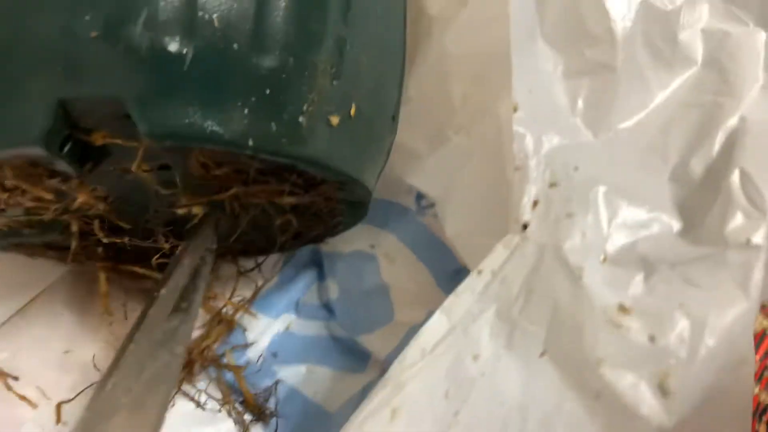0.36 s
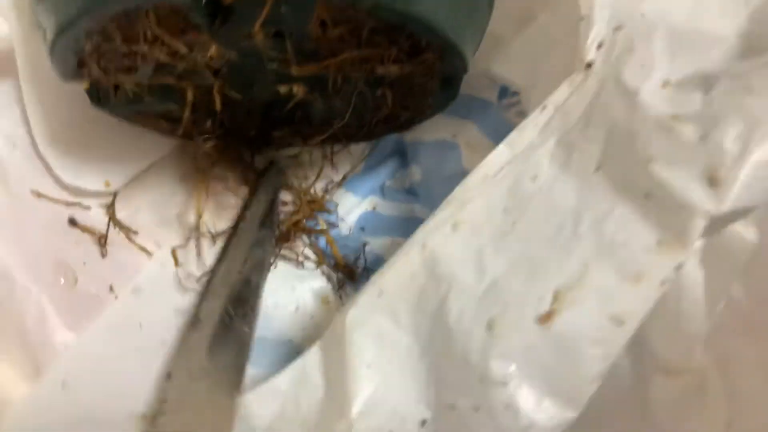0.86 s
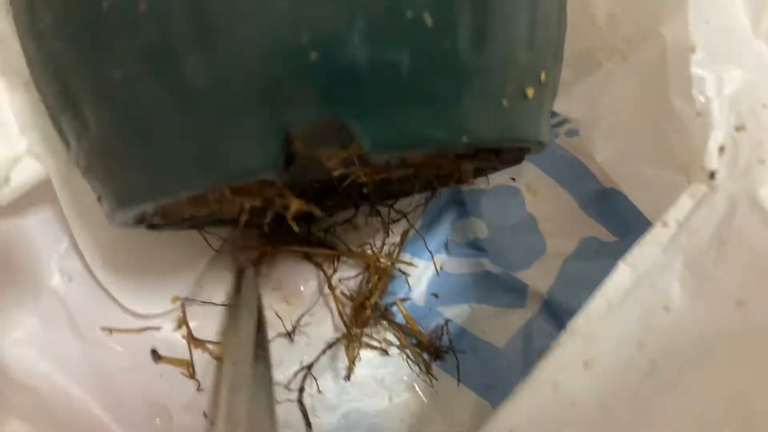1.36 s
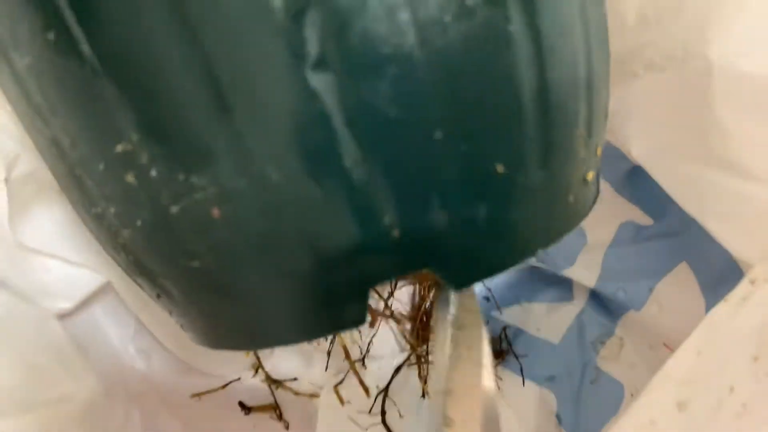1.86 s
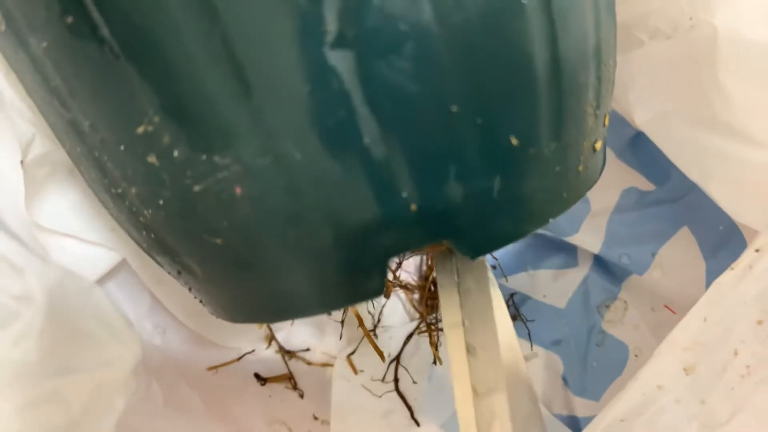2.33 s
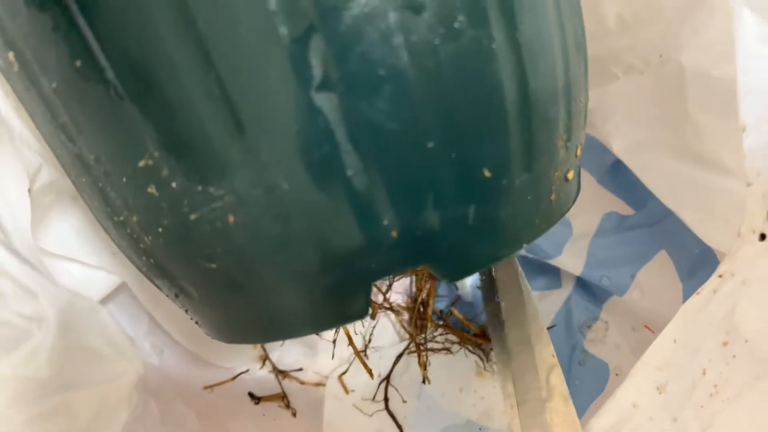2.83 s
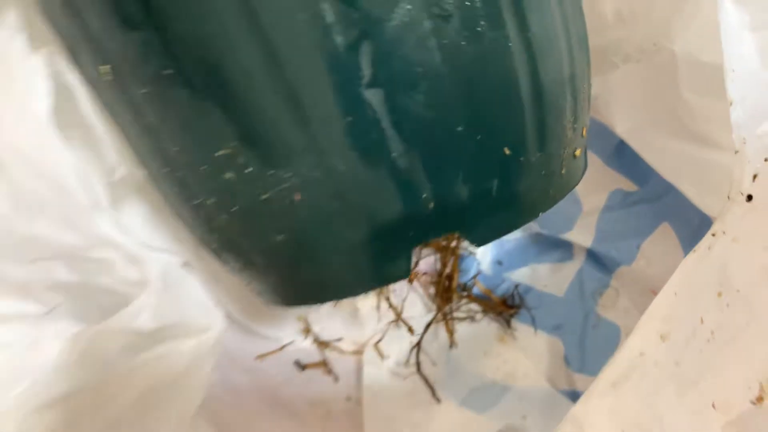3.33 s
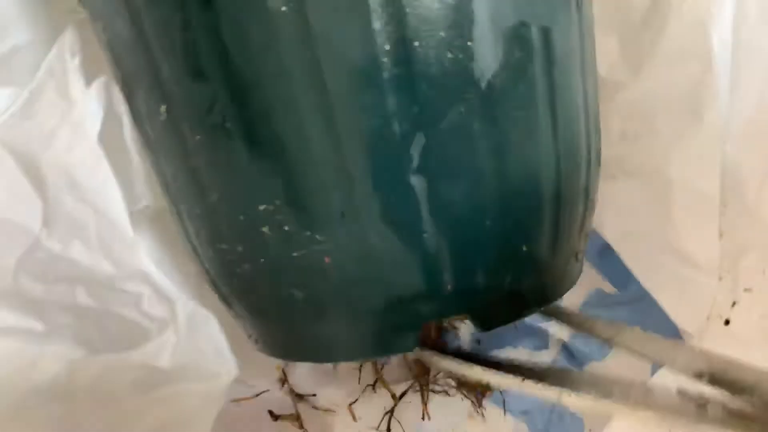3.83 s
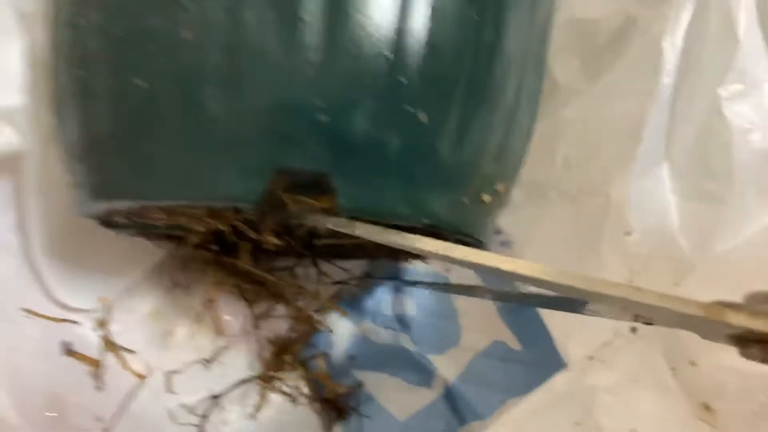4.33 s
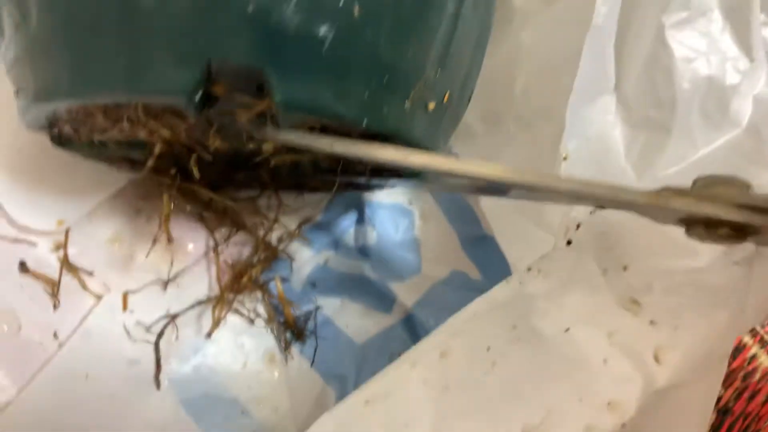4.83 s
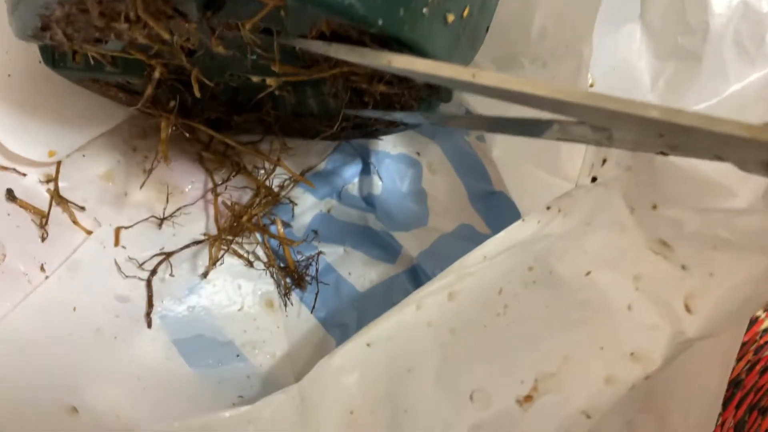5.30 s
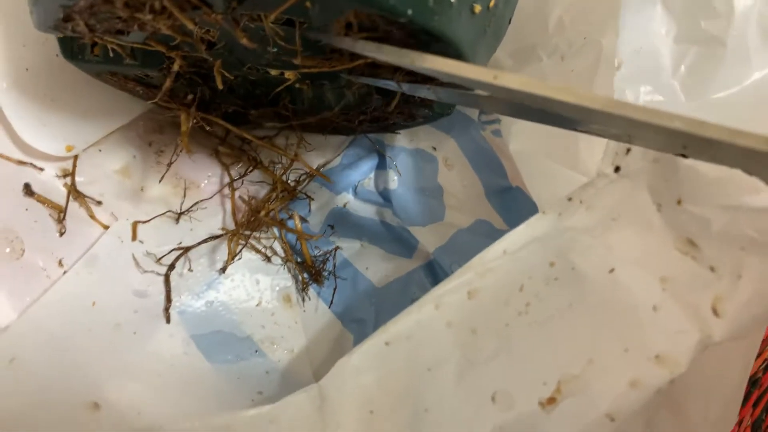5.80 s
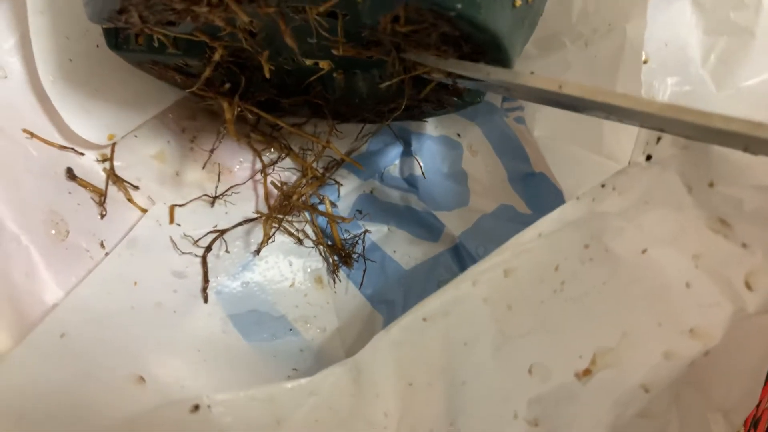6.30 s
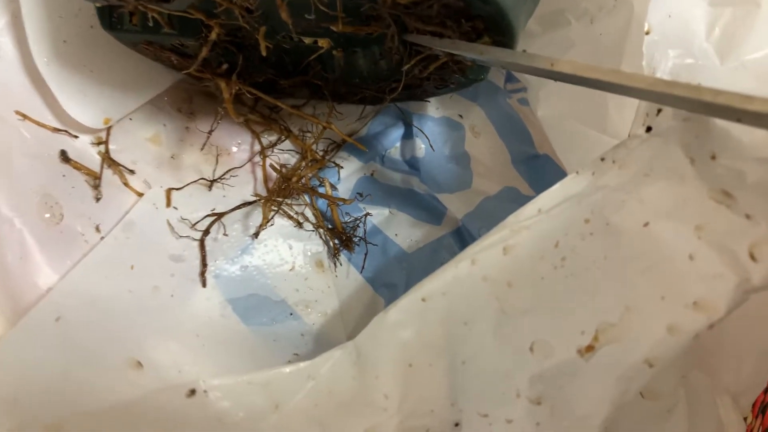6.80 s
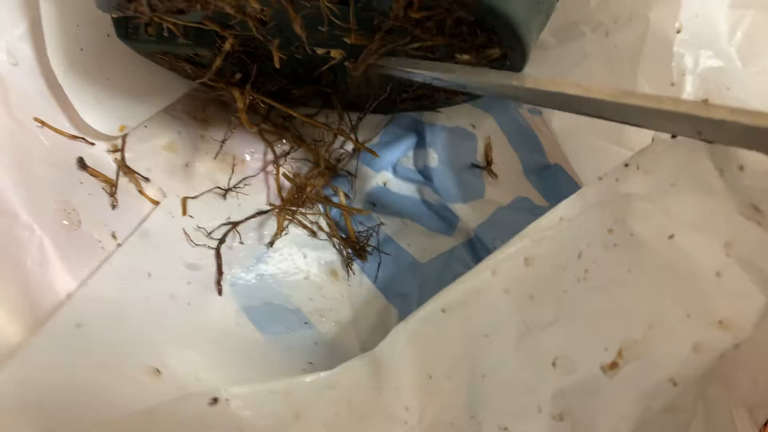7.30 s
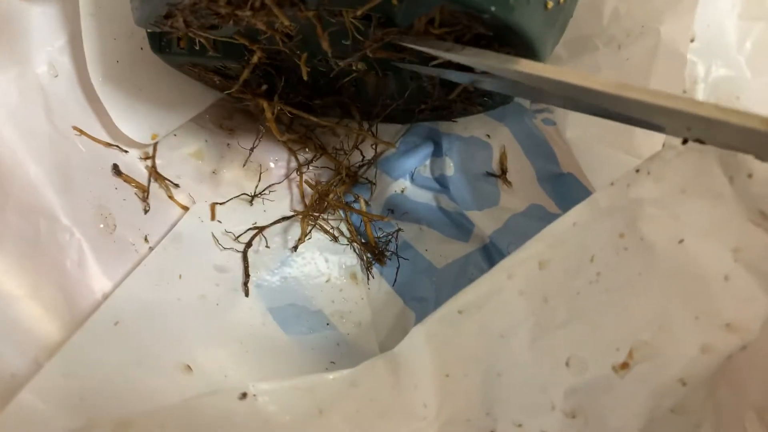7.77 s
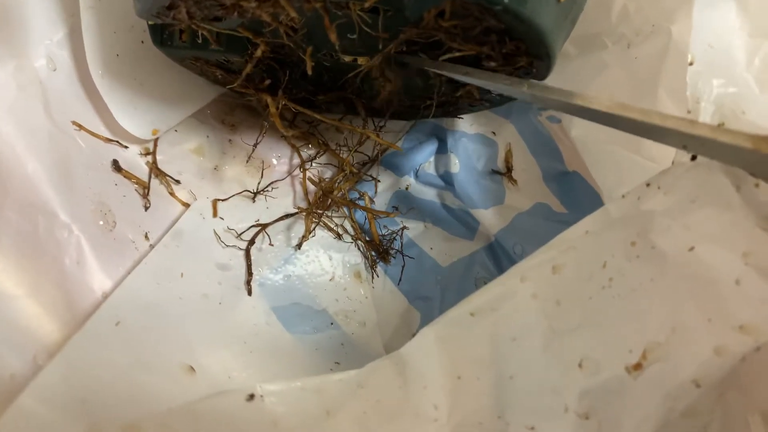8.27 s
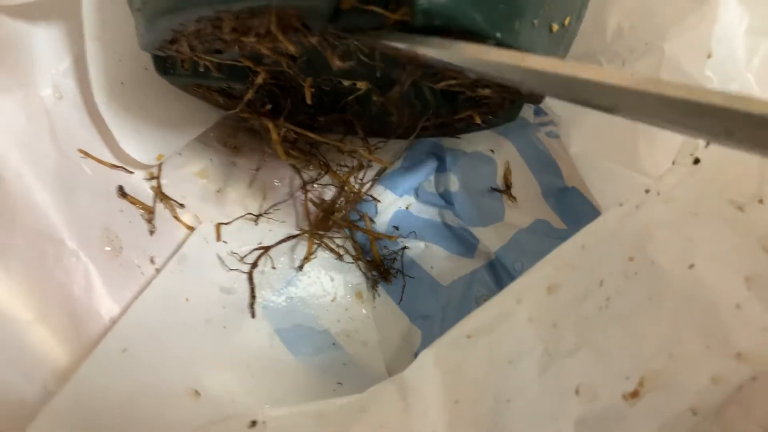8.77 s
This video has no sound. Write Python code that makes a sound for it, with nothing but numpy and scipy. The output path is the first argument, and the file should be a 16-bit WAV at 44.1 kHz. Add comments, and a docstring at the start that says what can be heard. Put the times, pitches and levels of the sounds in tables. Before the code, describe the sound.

Dry roots and thin plastic rustle and crackle busily, then quiet down; a pot knocks once, and later scissors snap shut amid renewed crackling.

```python
"""Scissors work through dry roots under a plastic plant pot on thin plastic bags, close to a phone in a quiet room.
Throughout, shaped noise is the room's air and wavering sines are a small motor. At first roots and film rustle
densely (friction noise in narrow bands) and crack (ringing noise bursts), with soft bumps (decaying modes).
Past 3 s the pot slides (swelling hiss) and knocks once (modal ringing); a faint sine whistle falls as rubbing goes on.
Past 8 s the blades grind (noise through modes) and snap shut once (modal ringing); dense rustle and cracks follow."""
import sys
import numpy as np
from scipy import signal
from scipy.fft import rfft, irfft, next_fast_len
from scipy.io import wavfile
from scipy.ndimage import uniform_filter1d

SR = 44100
rng = np.random.default_rng(int(sys.argv[2]) if len(sys.argv) > 2 else 0)


def nominal_scale(level):
    """Amplitude ratio for a level in decibels (scalar or array-like)."""
    x = np.asarray(level, float) / 20
    return 10 ** x


def transcribe(u):
    """Save the signal u as a 16-bit wav file named by the first command-line argument.

    u: samples, shape (n,) or (channels, n), limited to [-1, 1]; the rate is SR.
    q: integer samples, one column per channel.
    """
    v = np.clip(np.atleast_2d(u).T, -1, 1)
    q = np.round(v * 32767).astype(np.int16)
    wavfile.write(sys.argv[1], SR, q)


N = 403074
T = np.arange(N) / SR  # t/s

# Spectrum of the room's air noise: f/Hz, relative density level/dB
ROOM_SPECTRUM = [(25, -38.5), (40, -9.5), (60, -6), (96, -3), (151, -7), (194, -4), (290, -5), (400, -15.5),
                 (751, -19.5), (1100, -23.5), (1500, -35), (3000, -44.5), (7900, -49.5), (8700, -53.5),
                 (13800, -53.5), (16000, -74)]
# Lines of the motor hum: f/Hz, mean amplitude level/dB, wavering rate/s^-1
HUM_LINES = [(93.3, -78, 28), (147.3, -56.5, 16), (257, -74.5, 29), (293, -70.5, 11)]
# Path of the faint falling whistle: t/s, f/Hz, amplitude level/dB
WHISTLE_PATH = [(3.96, 1960, -95), (4.0, 1910, -74), (4.08, 1850, -75), (4.1, 1720, -88), (4.14, 1665, -75),
                (4.34, 1530, -76), (4.38, 1500, -95)]
# Swell and fade of the sliding pot: t/s, mean rms level/dB
SLIDE_LEVELS = [(3.03, -87), (3.12, -66), (3.25, -58), (3.34, -58), (3.45, -60), (3.5, -66), (3.56, -83)]
# Spectrum of the sliding hiss: f/Hz, relative density level/dB
SLIDE_SPECTRUM = [(300, 0), (900, -1.5), (2000, -4), (4500, -5.5), (7600, -9), (8600, -20), (14000, -28),
                  (16000, -40)]
# Blades grinding along each other as they close and part: t/s, rms level before decay/dB, t60/ms
BLADE_SCRAPES = [(8.311, -36, 70), (8.3195, -27.5, 9.8), (8.329, -34, 51), (8.335, -42.5, 240)]
# Modes of the blades: f/Hz, relative level/dB, t60/ms
BLADE_MODES = [(2150, -17, 6), (3300, -14, 3.5), (4300, 0, 3.2), (5440, -5, 5.5), (7150, -2.5, 4.5),
               (7700, -5, 3), (9750, -11, 4.5), (14500, -34, 4)]
# Soft bumps of pot and hand: t/s, mode level/dB, f/Hz, t60/ms, level of the jolt through the phone/dB
SOFT_BUMPS = [(0.696, -28, 275, 30, -37), (0.765, -34, 323, 28, -36), (1.14, -42, 276, 44, -35.5),
              (1.333, -40.5, 553, 67, -36.5), (2.499, -45, 427, 35, -75), (4.112, -35, 400, 32, -59),
              (6.964, -26.5, 519, 23, -47), (6.975, -33, 266, 40, -38.5), (6.973, -32, 610, 30, -53),
              (8.317, -38, 436, 53, -52), (8.431, -27, 567, 22, -55), (8.442, -42, 416, 130, -42),
              (8.499, -37.5, 257, 51, -38), (8.528, -36.5, 615, 23, -54), (8.69, -33, 280, 27, -45),
              (8.816, -39.5, 315.6, 65, -55), (8.996, -35.5, 433, 49, -40), (9.025, -33, 314, 37, -56),
              (9.11, -38, 583, 25, -49)]
# Modes of the pot: f/Hz, relative level/dB, t60/ms
POT_MODES = [(692, -1, 25), (729, -4.5, 25), (980, -2, 13), (1220, -1, 8.2), (1570, -2.5, 10.7),
             (2430, -21, 7.8), (3100, -21, 10), (4400, -16, 4.7), (6500, -13.5, 1.8)]
# Clearest cracks of root and film: t/s, peak level of the bright part/dB, ring f/Hz, airy part re bright part/dB
CLEAR_CRACKS = [(0.022, -36.5, 4800, -6), (0.0373, -39.5, 7240, -11), (0.0633, -37.5, 4370, -2.5),
                (0.0789, -33.5, 4160, -11), (0.1567, -39, 5400, -9), (0.3606, -42, 1690, -7),
                (0.4612, -35, 1550, -8), (0.4761, -27.5, 3320, -12), (0.5132, -38.5, 3330, -22),
                (0.593, -33.5, 4560, -2), (0.615, -30, 5040, -1.5), (0.625, -28, 2800, -16),
                (0.685, -27, 5100, -11), (0.7083, -16.5, 4440, -8), (0.735, -33.5, 7500, 6),
                (0.7477, -30, 2410, -4), (0.7522, -41, 6000, -13), (0.7624, -23.5, 3550, -23),
                (0.7806, -30.5, 4200, -8), (0.8024, -38, 6000, -10), (0.8106, -37, 3350, -11),
                (0.84, -22.5, 2490, -6.5), (0.8599, -31.5, 1700, -5), (0.9022, -22.5, 5900, -7),
                (0.907, -36, 6000, -3), (0.9134, -29, 6900, -2), (0.9212, -21, 6800, -8),
                (0.9304, -31, 6650, -7), (0.966, -44, 2500, -14), (0.9779, -32, 6500, -13),
                (1.0033, -36, 8060, 4), (1.042, -37, 7920, -1), (1.068, -32.5, 3100, -9),
                (1.1033, -36, 4110, -10), (1.1134, -40, 4380, -7), (1.1398, -25, 3200, -38),
                (1.2132, -49, 2360, -13), (1.2585, -50, 4000, -1), (1.2858, -45, 3000, -10),
                (1.314, -35, 2360, -9), (1.3285, -28, 3960, -6), (1.3337, -21, 6440, -4),
                (1.339, -29, 3020, -13), (1.348, -30, 5270, -13), (1.3867, -30, 5800, -2),
                (1.412, -42, 5000, 0), (1.4155, -37, 4500, -14), (1.4414, -29, 1680, -16),
                (1.4544, -19, 5470, -7), (1.465, -28, 3000, -4), (1.4804, -31, 5480, -6),
                (1.4888, -27.5, 5400, -2), (1.517, -47, 3000, -10), (1.5731, -44, 3200, -18),
                (1.5812, -32.5, 2530, -13), (1.6471, -30.5, 7600, -15), (1.671, -26.5, 7000, -4),
                (1.7417, -52, 4000, -8), (1.7764, -42.5, 7940, 7), (1.8318, -34, 1750, -23),
                (1.866, -44, 7400, -11), (1.964, -65, 4000, -10), (2.0166, -46, 2200, -20),
                (2.05, -48, 2430, 5.5), (2.057, -38.5, 2380, -13), (2.1056, -41, 2170, 2),
                (2.1505, -46, 3900, -19), (2.363, -61.5, 2000, -15), (2.745, -52.5, 2110, -16),
                (2.8759, -47, 5700, -12), (2.9351, -36, 5740, -10), (3.11, -57, 5600, -12),
                (3.436, -49, 5500, -15), (3.5525, -38, 5740, -15), (3.561, -45, 5900, -13),
                (3.6118, -40, 8100, -20), (4.1095, -45.5, 1910, -3.5), (4.2738, -48.5, 1620, -20),
                (4.301, -49, 4200, -13), (4.3371, -43.5, 7500, -13), (4.624, -48.5, 4530, -9),
                (4.868, -59, 4000, -10), (4.956, -48, 1470, -17), (4.9935, -45, 4530, -22),
                (5.083, -45.5, 3000, -12), (5.2943, -51.5, 2340, -11), (5.3321, -55, 2360, -13),
                (5.395, -54, 2000, -14), (5.4024, -49, 3600, -16), (5.4204, -50, 3500, -12),
                (5.429, -50, 5000, -9), (5.44, -46.5, 4500, -16), (5.4854, -42, 5960, -5.5),
                (5.7695, -42.5, 2500, -20), (5.8563, -35.5, 5500, -12), (5.939, -51, 4000, -10),
                (6.072, -44, 7500, -3), (6.1619, -62, 1710, 5), (6.2612, -56, 3030, -21),
                (6.3374, -49.5, 6400, 0), (6.457, -59.5, 3000, -8), (6.523, -58, 3000, -12),
                (6.545, -52.5, 3500, -8), (6.588, -49, 3590, -11), (6.6293, -50, 1520, -1),
                (6.8256, -54, 2630, -9), (6.9535, -31, 7000, -6), (6.9729, -37, 2200, -13),
                (7.0686, -41.5, 7560, -5), (7.1015, -41, 6400, -9), (7.1714, -41, 6030, -12),
                (7.3073, -50, 6060, -4), (7.4834, -58, 7940, 2), (7.531, -61, 6000, -8),
                (7.549, -55, 7900, -5), (7.673, -59, 1570, -9), (7.859, -57.5, 1790, -9),
                (8.2052, -50, 7800, -2), (8.2243, -47.5, 7610, -4), (8.2637, -52, 7500, -8),
                (8.2734, -38.5, 7530, -0.5), (8.43, -35, 1870, -6), (8.46, -47, 6500, -9),
                (8.4818, -43, 1840, 5.5), (8.4882, -36, 6920, 0), (8.515, -39, 2480, -6),
                (8.527, -28, 7470, -4), (8.578, -43, 3290, -16), (8.6063, -36, 7100, -19),
                (8.6237, -38, 5050, -8), (8.6646, -32.5, 6240, -5), (8.677, -33, 6000, -8),
                (8.6898, -37.5, 4800, -19), (8.7034, -43, 4750, -24), (8.8157, -40.5, 7050, -19),
                (8.8238, -39, 6030, -6), (8.8954, -46, 4640, -6), (8.9125, -34.5, 5570, -19),
                (8.917, -30, 7240, 4), (8.964, -39, 3200, -10), (8.996, -29.5, 6760, -4.5),
                (9.0257, -34, 3180, -10), (9.0473, -38, 3350, -11), (9.0745, -35, 5770, -18),
                (9.111, -26.5, 7010, -2)]
# Each push or drag through roots and film: t of the maximum/s, rise/s, fall/s (both span 20 dB),
# nominal level from 1.5 to 8 kHz/dB, air above 8 kHz re that level/dB, brightest f/Hz
RUB_STROKES = [(0.034, 0.023, 0.092, -56, -10.5, 3720), (.155, .07, .045, -58.5, -15.5, 3480),
               (.366, .006, 0.35, -51.5, -11, 2800), (.49, 0.11, 0.042, -50, -6.5, 4270),
               (0.623, 0.008, 0.23, -47, -13, 3780), (.7, 0.05, .1, -42, -15, 3530),
               (.76, .15, .15, -52, -5, 3830), (0.912, 0.12, .3, -45.5, -8, 4630),
               (1.03, 0.3, .09, -54, -13, 4900), (1.15, .02, 0.064, -52.5, -7, 4100),
               (1.29, .012, .1, -65, -11, 3500), (1.34, 0.055, .06, -41.5, -7.5, 4800),
               (1.46, .1, .11, -45.5, -10, 4700), (1.673, .3, 0.059, -51, -10, 3160),
               (1.8, .2, .12, -60.5, -10.5, 4050), (1.948, .012, .1, -69, -3, 6500),
               (2.07, .25, 0.13, -62.5, -10.5, 3400), (2.379, 0.081, 0.19, -78, -21, 2030),
               (2.499, .045, .055, -72, -6, 2180), (2.594, 0.096, 0.063, -76, -4, 2200),
               (2.755, .05, 0.082, -74, -22, 2190), (2.81, 0.011, 0.11, -65, -29, 4900),
               (2.855, 0.046, 0.16, -63, -18.5, 5430), (2.96, 0.042, 0.05, -59, -17.5, 5300),
               (3.509, .1, .1, -74.5, 1.5, 4000), (3.564, 0.035, .15, -65.5, -1.5, 5150),
               (3.621, .15, 0.21, -61, -8.5, 4260), (3.9, .6, .3, -70.5, -16, 2820),
               (4.006, .08, 0.107, -60, -15.5, 3100), (4.121, .15, .11, -63, -14, 3860),
               (4.349, 0.17, 0.12, -67, -12, 3900), (4.469, 0.042, 0.056, -65, -18.5, 3560),
               (4.63, 0.29, 0.15, -71.5, -17, 3160), (4.805, .08, .4, -75, -16.5, 2970),
               (4.968, 0.025, 0.23, -65.5, -27, 2800), (5.11, 0.081, .12, -59.5, -13, 4400),
               (5.305, 0.015, .08, -66.5, -32, 2500), (5.434, 0.048, 0.052, -63, -21.5, 3630),
               (5.504, 0.037, .08, -62.5, -8.5, 4500), (5.78, 0.021, 0.064, -68, -6, 3660),
               (5.864, .05, 0.19, -62, -14, 4300), (6.069, 0.29, 0.12, -60, -8.5, 4500),
               (6.348, 0.33, .16, -75, -7.5, 3460), (6.475, .05, .055, -75, -9.5, 2600),
               (6.588, 0.09, .11, -62, -12, 3330), (6.84, .08, 0.078, -72.5, -28, 2700),
               (6.958, 0.014, 0.076, -46, -9.5, 5600), (6.99, .03, .12, -55.5, -24.5, 1700),
               (7.11, .07, 0.3, -59.5, -13, 5860), (7.202, .15, 0.087, -52.5, -11, 5460),
               (7.34, 0.14, .05, -65, -9.5, 5350), (7.554, .055, 0.09, -71, 2.5, 3610),
               (7.718, 0.063, 0.54, -78, -23.5, 2800), (7.81, .1, 0.15, -73, -17, 3500),
               (7.978, .13, 0.042, -73, -15.5, 2400), (8.213, 0.022, .06, -65.5, -10, 6970),
               (8.276, .03, 0.12, -62, -18, 6940), (8.425, .018, 0.24, -56.5, -7, 5000),
               (8.549, .15, .12, -59, -7, 4300), (8.46, .05, .15, -57, -20.5, 1500),
               (8.67, 0.11, 0.075, -51, -2.5, 5050), (8.824, .012, .07, -60.5, -11.5, 4300),
               (8.918, 0.021, .11, -54, -6, 4860), (9.066, 0.15, 0.31, -50.5, -4.5, 4440),
               (9.139, 0.1, .3, -49, -5, 5300)]
# Spectrum of the friction noise before it is split in bands: f/Hz, relative density level/dB
RUSTLE_SPECTRUM = [(240, 9), (800, 3.5), (1500, 2), (3000, -5.5), (6100, -4.5), (7400, -2), (8800, -6.5),
                   (13500, -13), (16000, -26)]
# Centres of the overlapping friction bands: f/Hz
BAND_CENTRES = np.r_[8000 * 2 ** (-np.arange(16, -1, -1) / 3.2), 8500, 10000, 12000, 14000, 16500]


def level(x, db):
    """Root-mean-square scaling: the mean power of a signal sets its level in dB."""
    return x * nominal_scale(db) / np.sqrt(np.mean(x ** 2))


def colour(x, points):
    """Spectral weighting: gain in dB is linear in log frequency between (f/Hz, level/dB) points."""
    hz, db = np.transpose(points)
    size = next_fast_len(x.shape[-1])
    f = np.maximum(np.arange(size // 2 + 1) * SR / size, 1)
    gain = nominal_scale(np.interp(np.log(f), np.log(hz), db))
    return irfft(rfft(x, size) * gain, size)[..., :x.shape[-1]]


def band(x, lo_hz, hi_hz):
    """Causal band-pass: a resonant system responds only after its excitation."""
    sos = signal.butter(3, [lo_hz, min(hi_hz, SR / 2.1)], "band", fs=SR, output="sos")
    return signal.sosfilt(sos, x)


def split(x):
    """Superposition: overlapping narrow bands add up to the whole between the outermost centres."""
    size = next_fast_len(N)
    log_f = np.log(np.arange(1, size // 2 + 2) * SR / size)
    spectrum = rfft(x, size)
    bands = []
    for row in np.eye(len(BAND_CENTRES)):
        weight = np.interp(log_f, np.log(BAND_CENTRES), row, left=0, right=0)
        bands.append(irfft(spectrum * weight, size)[:N])
    return bands


def walk(rate):
    """Random fluctuation: levels held for 1 / rate s and smoothed twice, with unit standard deviation."""
    hold = int(SR / rate)
    steps = np.repeat(rng.standard_normal(N // hold + 1), hold)
    w = uniform_filter1d(uniform_filter1d(steps, hold), hold)[:N]
    return w / w.std()


def add(out, s, x):
    """Linear superposition of a short sound at time s."""
    i = int(s * SR)
    out[i:i + len(x)] += x[:N - i]


def fade(t60_ms, size=4096):
    """Exponential damping: the amplitude falls by 60 dB in t60."""
    return np.exp(-np.log(1000) * np.arange(size) / SR * 1000 / max(t60_ms, 1))


def ring(modes, lag, swell):
    """Modal sum: modes start late by lag and swell over swell of their own periods, so higher ones build sooner."""
    out = np.zeros(8192)
    for hz, db, t60_ms in modes:
        turns = np.arange(4096) / SR * hz
        attack = 1 - np.exp(-turns / swell)
        add(out, lag / hz, nominal_scale(db) * fade(t60_ms) * attack * np.sin(2 * np.pi * turns))
    return out


def room():
    """Stationary noise with slow level drift, plus motor lines that waver in amplitude and phase."""
    air = level(colour(rng.standard_normal(N), ROOM_SPECTRUM), -57.5) * nominal_scale(.8 * walk(3))
    hum = 0
    for hz, db, rate in HUM_LINES:
        loudness = nominal_scale(db + 2.4 * walk(rate))
        hum = hum + loudness * np.sin(2 * np.pi * hz * T + 0.22 * walk(rate))
    return air + hum


def whistle():
    """Frequency modulation: integrating a frequency that slides down in two steps gives the tone's phase."""
    s, hz, db = np.transpose(WHISTLE_PATH)
    phase = 2 * np.pi * np.cumsum(np.interp(T, s, hz)) / SR
    return nominal_scale(np.interp(T, s, db, left=-140, right=-140)) * np.sin(phase)


def slide():
    """Steady sliding friction: the pot over the film gives an even hiss that swells, holds and fades."""
    s, db = np.transpose(SLIDE_LEVELS)
    hiss = level(colour(rng.standard_normal(N), SLIDE_SPECTRUM), 0)
    return hiss * nominal_scale(np.interp(T, s, db, left=-140, right=-140) + .7 * walk(29.7))


def scrape():
    """Forced vibration: rough noise of edge grinding on edge excites the modes of the blades."""
    out = np.zeros(N)
    modes = [(hz, 0.45 * db, 3.5) for hz, db, _ in BLADE_MODES[:-1]]
    for (s, db, t60_ms), noise in zip(BLADE_SCRAPES, rng.standard_normal((len(BLADE_SCRAPES), 8192))):
        grit_db = 2.0 * walk(600)[:8192]
        rung = signal.fftconvolve(noise * nominal_scale(grit_db), ring(modes, lag=0, swell=.8))[:8192]
        add(out, s, level(rung, db) * fade(t60_ms, size=8192))
    return out


def blows():
    """Impact excitation: soft bumps, the hollow knock of the pot and the snap of the blades ring in modes."""
    out = np.zeros(N)
    for s, db, hz, t60_ms, jolt_db in SOFT_BUMPS:
        modes = [(hz, db, t60_ms), (1.6 * hz, db - 1.5, 0.5 * t60_ms), (90, jolt_db, 100)]
        add(out, s, ring(modes, lag=0, swell=0.76))
    knock_s, knock_db = 3.6585, -8.5
    add(out, knock_s, nominal_scale(knock_db) * ring(POT_MODES, lag=0.824, swell=0.49))
    snip_s, snip_db = 8.3177, -4
    add(out, snip_s, -nominal_scale(snip_db) * ring(BLADE_MODES, lag=.5, swell=.6))
    return out


def below_top(t, s, rise, fall):
    """Stroke envelope: level in dB relative to the maximum of a rub at times t."""
    roundness = 1.23  # 1 = straight slopes in dB, more = rounder tops
    distance = np.where(t < s, (s - t) / max(rise, .005), (t - s) / max(fall, .005))
    return -20 * distance.clip(0) ** roundness


def ticks(count):
    """Random microfracture: count small cracks at chance moments of every rub, as crack rows."""
    tick_db, spread_db, tick_air_db, spread_octaves = 4, 2.5, -9.5, 0.55  # levels re the rub they ride on
    rows = []
    all_draws = rng.standard_normal((len(RUB_STROKES), count, 3))
    for (s, rise, fall, db, air_db, hz), draws in zip(RUB_STROKES, all_draws):
        for when, size, pitch in draws:
            t = s + 0.5 * when * (fall if when > 0 else rise)
            if 0 < t < T[-1]:
                rub_db = db + below_top(t, s, rise, fall)
                peak_db = rub_db + tick_db + 0.36 * (air_db + 10.5) + spread_db * size
                ring_hz = np.clip(hz * 2 ** (spread_octaves * pitch), 1500, 8000)
                rows.append((t, peak_db, ring_hz, air_db + 12 + tick_air_db))
    return rows


def cracks():
    """Sudden fracture: each burst rings broadly about its own pitch, with a dull and an airy part."""
    t60_4k_ms, t60_slope, t60_log_spread = 9.5, -.4, .25  # lower cracks ring longer
    echo_gain, echo_ms = .45, .9  # back off the pot or the bag just beside it; typical lag
    out = np.zeros(N)
    onset = 1 - fade(.6, size=2048)
    rows = CLEAR_CRACKS + ticks(count=2)
    for (s, db, hz, air_db), (chance, gap, *noise) in zip(rows, rng.standard_normal((len(rows), 2050))):
        t60_ms = t60_4k_ms * (hz / 4000) ** t60_slope * np.exp(t60_log_spread * chance)
        burst = noise * onset * (fade(t60_ms, size=2048) + 0.049 * fade(4 * t60_ms, size=2048))
        lag = int(echo_ms * SR / 1000 * 1.6 ** gap)
        burst = burst + echo_gain * np.r_[np.zeros(lag), burst][:2048]
        narrow = 1.03 * band(burst, hz / 1.206, hz * 1.196)
        bright = narrow + band(burst, hz / 2.4, min(3.2 * hz, 8200))
        parts = bright, band(burst, 400, 1900), band(burst, 6000, 13000)
        dull_db = -14 - 4 * np.log2(hz / 3000)  # low-pitched cracks carry more body
        crack = sum(nominal_scale(d) * p / np.abs(p).max() for d, p in zip((0, dull_db, air_db), parts))
        add(out, s, nominal_scale(db) * crack)
    return out


def slips(per_s, spread_db, t60_ms):
    """Stick-slip statistics: envelope of tiny random slips of very unequal size, with unit rms."""
    sizes = nominal_scale(spread_db * rng.exponential(size=N).clip(0, 3.5))
    hits = (rng.random(N) < per_s / SR) * sizes
    power = signal.oaconvolve(hits ** 2, fade(t60_ms, size=1024) ** 2)[:N]
    return level(np.sqrt(power.clip(0)), 0)


def motion():
    """Power addition of all rubs: nominal mid, body and air levels in dB, and brightest frequency in Hz."""
    rest_db, rest_air_db, rest_hz = -90, -6, 2500  # faint handling between rubs; air re rest_db
    air_steeper = 1.43  # the treble comes later and goes sooner
    t = T[::64]
    mid, air = nominal_scale(rest_db + 0 * t) ** 2, nominal_scale(rest_db + rest_air_db + 0 * t) ** 2
    octave = mid * np.log2(rest_hz)
    for s, rise, fall, db, air_db, hz in RUB_STROKES:
        down = below_top(t, s, rise, fall)
        power = nominal_scale(db + down) ** 2
        mid = mid + power
        octave = octave + power * np.log2(hz)
        air = air + nominal_scale(db + air_db + air_steeper * down) ** 2
    mid_db, bright_hz = 10 * np.log10(mid), 2 ** (octave / mid)
    # body lies below 1.5 kHz: level at a -60 dB rub, dB per dB, dB per octave (duller rubs have more)
    body_db = -60.5 + 0.72 * (mid_db + 60) - 3.5 * np.log2(bright_hz / 4000)
    return [np.interp(T, t, c) for c in (mid_db, body_db, 10 * np.log10(air), bright_hz)]


def rustle():
    """Friction noise: smooth rubbing breaks up into crackle as the film snaps more, its colour in patches."""
    mid_db, body_db, air_db, bright_hz = motion()
    # snapping film is what brings the treble
    crackle = np.clip((air_db + 97) / 28, .25, 1) * np.clip((air_db - mid_db + 27.5) / 14, .2, 1)
    rub = nominal_scale(2.0 * walk(40)) * (1 - 0.36 * crackle)
    broad = slips(per_s=260., spread_db=2.8, t60_ms=9.)
    body, mid, air, power = 0, 0, 0, 0
    for hz, part in zip(BAND_CENTRES, split(colour(rng.standard_normal(N), RUSTLE_SPECTRUM))):
        # wide snaps are heard in all bands at once, small ones ring at one pitch only
        pitched = slips(per_s=67.0, spread_db=2.0, t60_ms=21.0)
        patches = nominal_scale((1.87 + 0.86 * crackle) * walk(25))
        snaps = crackle ** 2 * (0.7 * broad ** 2 + .3 * pitched ** 2)
        part = part * patches * np.sqrt(rub ** 2 + snaps)
        if hz < 1500:
            body = body + part
        elif hz < 8200:
            octaves = np.log2(hz / bright_hz)
            slope_db = np.where(octaves > 0, -8.0 * octaves, 5.2 * octaves)
            gain = nominal_scale(slope_db + 0.63 * np.exp(-(octaves / .25) ** 2))
            mid = mid + part * gain
            power = power + np.mean(part ** 2) * gain ** 2
        else:
            air = air + part
    # the moving resonance changes the colour, not the level
    mid = mid / np.sqrt(power)
    return level(body, -1.7) * nominal_scale(body_db) + mid * nominal_scale(mid_db - 3.0) + level(air, -0.35) * nominal_scale(air_db)


def scene():
    """Direct and reverberant sound: close sources with a thin tail from the walls, over whistle and room tone."""
    near = rustle() + cracks() + blows() + scrape() + slide()
    walls_db, walls_t60_ms = -33, 110
    walls = rng.standard_normal(16384) * fade(walls_t60_ms, size=16384)
    tail = signal.fftconvolve(near, walls / np.sqrt(np.sum(walls ** 2)))[:N]
    return (near + nominal_scale(walls_db) * tail + whistle() + room())[None]


def band_limit(x):
    """A steep low-pass at the top of the band."""
    return signal.sosfilt(signal.butter(12, 16650, fs=SR, output="sos"), x)


def record(dry):
    """Band limitation: the microphone misses the deepest bass; a steep low-pass ends the band at 16.4 kHz."""
    mix = signal.sosfilt(signal.butter(2, 40, "high", fs=SR, output="sos"), dry)
    mix = signal.sosfilt(signal.ellip(8, .2, 70, 16400, fs=SR, output="sos"), mix)
    return band_limit(mix)


dry = scene()
out = record(dry)
transcribe(out)
```